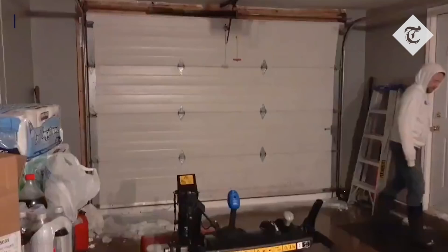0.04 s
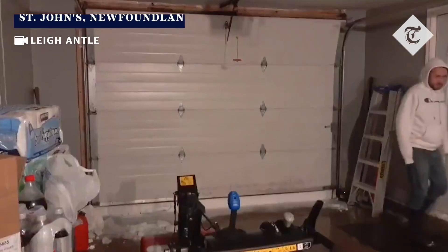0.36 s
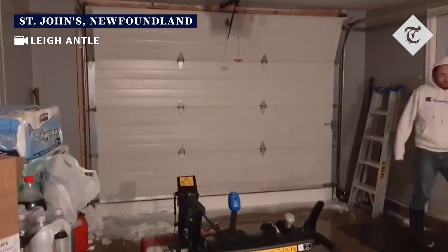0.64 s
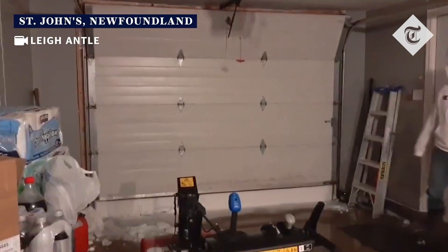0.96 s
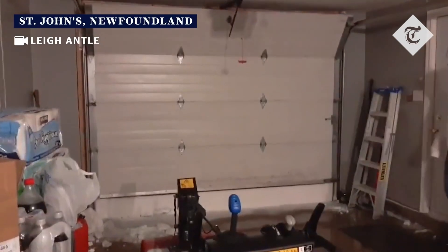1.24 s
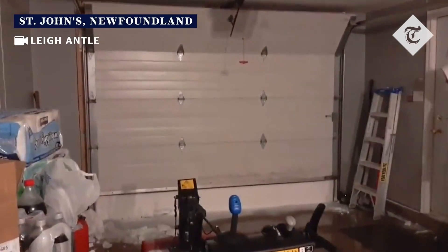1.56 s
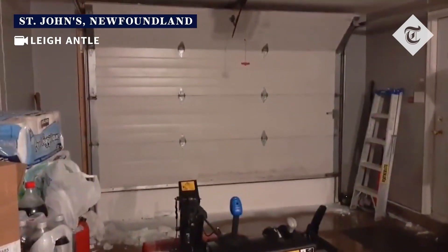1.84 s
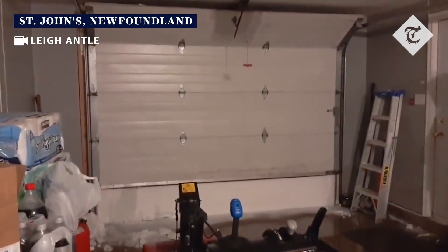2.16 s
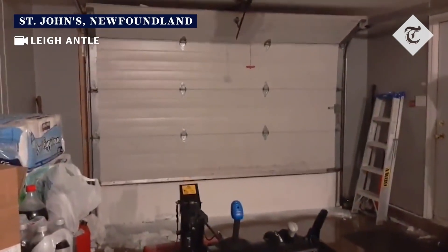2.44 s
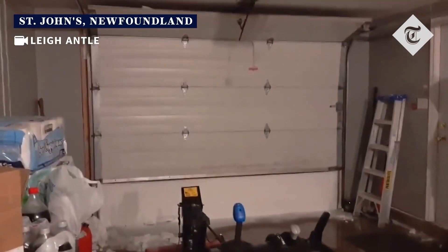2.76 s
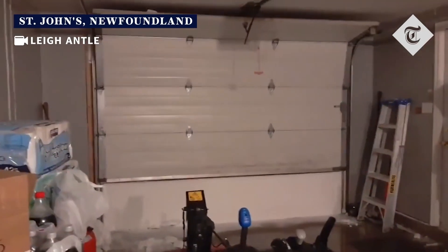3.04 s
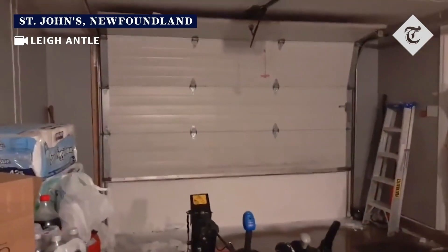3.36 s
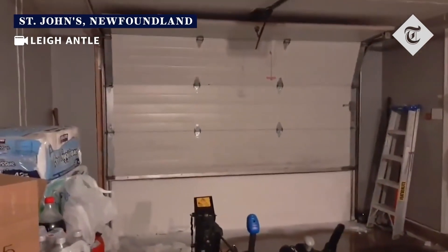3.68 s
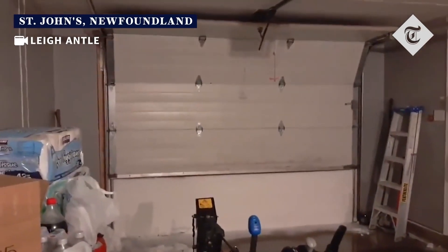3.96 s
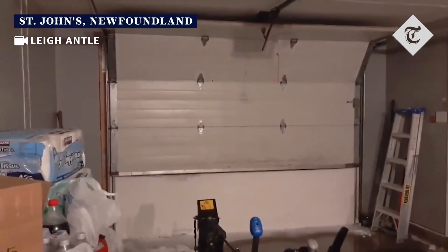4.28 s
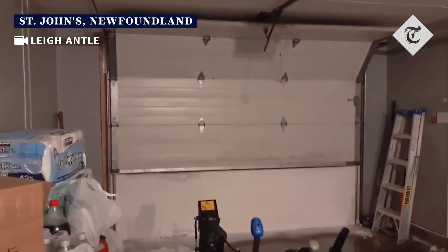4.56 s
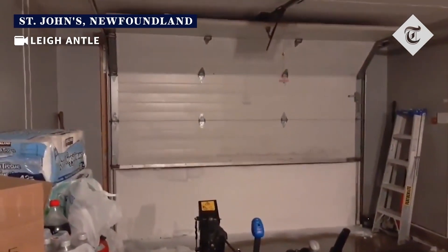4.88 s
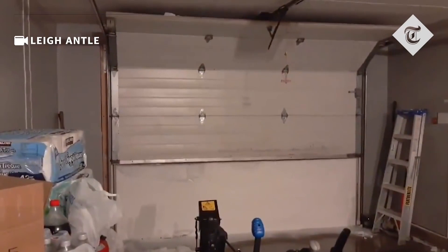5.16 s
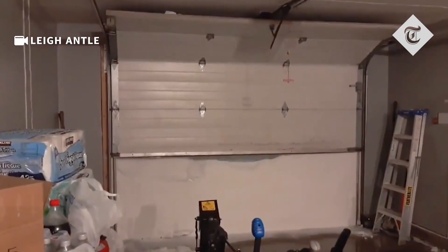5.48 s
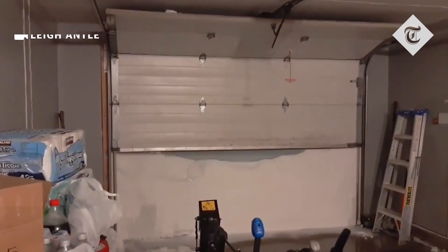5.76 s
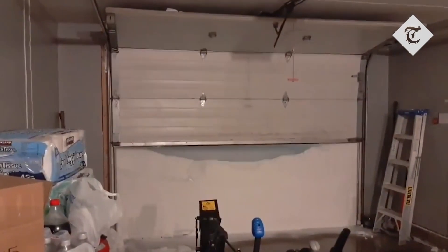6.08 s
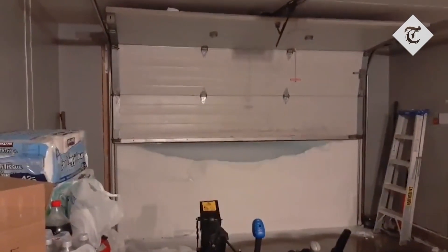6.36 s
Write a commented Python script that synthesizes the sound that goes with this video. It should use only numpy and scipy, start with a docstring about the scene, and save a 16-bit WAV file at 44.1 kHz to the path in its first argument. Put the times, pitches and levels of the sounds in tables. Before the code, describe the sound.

A garage door opener starts up and runs throughout, its motor humming under a quick, bright chain ticking. Early on, the rollers scrape and clack in the metal tracks as the door lifts. The hum then surges, carries on with scattered hinge clinks and faint rattles, and surges again near the end among more clinks. It is heard from straight ahead inside a small, slightly echoing garage.

```python
"""A motor hums, a chain ticks and rollers clatter as an opener lifts a sectional door in a small garage.
The induction motor hums at twice the mains frequency, with sidebands from its shaft, while the worm
gear churns in the housing. The chain ticks over its sprocket and makes the rail drone when taut.
Rollers scrape and knock through the bend of the steel tracks, and hinges clink. The hum sinks as
a panel tips and surges as the motor takes up the weight."""
import sys
import numpy as np
from scipy import signal
from scipy.fft import rfft, irfft, next_fast_len
from scipy.io import wavfile
from scipy.ndimage import map_coordinates

SR = 44100
rng = np.random.default_rng(int(sys.argv[2]) if len(sys.argv) > 2 else 0)


def master(y):
    """Save y as 16-bit WAV."""
    cut = np.clip(np.atleast_2d(y).T, -1, 1)
    pcm = np.round(cut * 32767)  # scale
    wavfile.write(sys.argv[1], SR, pcm.astype(np.int16))


N = 283122

START_S = 0.26  # the motor switches on
MAINS_HZ, SHAFT_HZ = 60, 26.55
# panels tipping into the bend: (time [s], relative bump level [dB], dip in the motor's load [dB])
PANEL_BUMPS = [(1.352, -55, 4), (3.128, -64, 0), (5.372, -48, 2)]
# the bright colour of chain metal: (frequency [Hz], relative level [dB])
CHAIN_SPECTRUM = [(700, -24.5), (2500, -7), (4000, -8.5), (6600, -8), (8200, -2), (9200, -2.5),
                  (10300, 0.5), (11300, 0.5), (12000, -2), (12900, -1), (14000, -6)]


def amp(db):
    """Decibels to gain."""
    return 10 ** (np.asarray(db) / 20)


def unit(x):
    """x at rms 1."""
    return x / np.sqrt(np.mean(x ** 2) + 1e-20)


def along(points, hz):
    """(Hz, value) points read on a log frequency axis."""
    point_hz, values = np.transpose(points)
    return np.interp(np.log(hz + 1), np.log(point_hz + 1), values)


def clock():
    """The time of every sample in seconds."""
    return np.arange(N) / SR


def wobble(rate):
    """A smooth random curve, rate knots a second."""
    return map_coordinates(rng.standard_normal(int(N * rate / SR) + 4), [clock() * rate])


def swell(start_s, attack_s, hold_s, release_s):
    """An envelope from 0 to 1 and back."""
    return np.interp(clock(), start_s + np.cumsum([0, attack_s, hold_s, release_s]), [0, 1, 1, 0])


def add(track, s, sound):
    """Mix a sound into the track at time s."""
    part = track[max(round(s * SR), 0):][:len(sound)]
    part += sound[:len(part)]


def filtered(x, response):
    """x shaped by a gain that depends on frequency."""
    size = next_fast_len(N + SR // 2)
    return irfft(rfft(x, size) * response(np.fft.rfftfreq(size, 1 / SR)), size)[..., :N]


def coloured(x, spectrum):
    """x through a (Hz, dB) curve, scaled to keep the power of white noise."""
    norm = np.sqrt(np.mean(amp(along(spectrum, np.linspace(0, SR / 2, N))) ** 2))
    return filtered(x, lambda hz: amp(along(spectrum, hz)) / norm)


def tone(hz, drift, drift_rate):
    """A sine of rms 1 whose phase wanders by about drift radians."""
    return np.sqrt(2) * np.sin(2 * np.pi * (hz * clock() + rng.random()) + drift * wobble(drift_rate))


def grains(rate, spread_db):
    """Tiny random contacts of uneven size, about rate a second, at rms 1."""
    hits = rng.random(N) < rate / SR
    return unit(hits * rng.standard_normal(N) * amp(spread_db * rng.standard_normal(N)))


def resonance(pitch_hz, width_hz):
    """A rubbed resonance: narrow noise of rms 1."""
    return unit(filtered(rng.standard_normal(N), lambda hz: 1 / (1 + ((hz - pitch_hz) / width_hz) ** 4)))


def shifting(x, depth_db):
    """Moving contacts favour ever different resonances."""
    spectra = signal.stft(x, nperseg=512)[2]
    patch = np.outer(signal.windows.hann(9), signal.windows.hann(19))  # bands by frames
    ripple = signal.fftconvolve(rng.standard_normal(spectra.shape), patch, "same")
    return signal.istft(spectra * amp(depth_db * unit(ripple)), nperseg=512)[1][:N]


def contact(t60, attack_s):
    """Loose metal chatters in a burst of noise that falls 60 dB in t60 seconds."""
    t = np.arange(SR // 4) / SR
    return rng.standard_normal(len(t)) * amp(-60 * t / t60) * (1 - np.exp(-t / attack_s))


def ping(hz, t60, attack_s):
    """A struck steel part rings briefly on one mode."""
    t = np.arange(SR // 8) / SR
    return np.sin(2 * np.pi * hz * t) * amp(-60 * t / t60) * (1 - np.exp(-t / attack_s))


def stroke(sound, length_s):
    """A short rub that swells and fades."""
    shape = np.sqrt(signal.windows.cosine(round(length_s * SR)))
    return shape * unit(sound[:len(shape)])


def garage(x, wet_db):
    """Direct sound plus the walls' answer, which changes as the door and chain move."""
    # the room's decay: (frequency [Hz], t60 [s])
    reverb_times = [(150, 0.51), (1500, 0.48), (6000, 0.32), (13000, 0.24)]
    echo, hop = np.zeros(N), SR // 8
    for i in range(0, N, hop):
        hz, t, spectra = signal.stft(rng.standard_normal(SR // 3), SR, nperseg=256)
        decay = amp(-60 * t / along(reverb_times, hz)[:, None])
        tail = signal.istft(spectra * decay, SR, nperseg=256)[1]
        add(echo, i / SR + 0.003, signal.fftconvolve(x[i:i + hop], tail / np.linalg.norm(tail)))
    return (x + amp(wet_db) * echo) / np.hypot(1, amp(wet_db))


def run_up(depth_db, time_s):
    """A level offset in dB that rises to 0 as the motor gathers speed."""
    return -depth_db * np.exp(-np.maximum(clock() - START_S, 0) / time_s)


def tension():
    """How taut the chain is: 1 would be fully taut, below 0 it hangs loose."""
    # the chain tightens or sags: (start [s], attack [s], hold [s], release [s], tension [1 = taut])
    pulls = [(.6, 0.63, 0.08, 0.31, 0.34), (2.4, 1.37, 0.88, 0.52, 0.79), (5.4, 0.52, 0.29, 0.15, -0.6)]
    return sum(strength * swell(*shape) for *shape, strength in pulls)


def bend():
    """How hard the first rollers press into the bend of the track, 0 to 1."""
    return swell(start_s=1.0, attack_s=0.35, hold_s=0.54, release_s=0.48)


def effort():
    """The motor's load in dB: it sinks as a panel tips and surges at each take-up."""
    # the motor takes up a panel's weight: (time [s], rise in load [dB])
    take_ups = [(2.18, 10.5), (5.49, 9)]
    surge = sum(db * swell(s, attack_s=0.026, hold_s=0.041, release_s=0.82) for s, db in take_ups)
    relief = sum(db * swell(s - 0.13, attack_s=0.065, hold_s=0, release_s=0.27)
                 for s, _, db in PANEL_BUMPS)
    return surge - relief


def friction(taut_db, bend_db):
    """The dB that a rubbing part gains from the motor's speed, the chain's pull and the bend."""
    easing_db = 0.21 * clock()  # parts run lighter as the door comes to lie overhead
    return run_up(depth_db=32, time_s=0.084) + taut_db * tension() + bend_db * bend() - easing_db


def hum_level(level_db, taut_db, load_share):
    """Level in dB of a motor tone that follows the load and swells with the chain's tension."""
    pull_db = taut_db * np.maximum(tension(), 0) ** 0.63
    return level_db + run_up(depth_db=20.5, time_s=0.13) + pull_db + load_share * effort()


def octave_level():
    """Level in dB of the hum's octave: a taut chain carries it into the rail, most of all midway."""
    midway = swell(start_s=3.52, attack_s=0.63, hold_s=1.0, release_s=0.13)
    return hum_level(level_db=-51.5, taut_db=5, load_share=0.26) + 4.76 * midway + 0.17 * clock()


def rotor_level():
    """Level in dB of the rotor's sideband: it grows with the lift and as the top panel clears the bend."""
    lifting = swell(start_s=0.74, attack_s=3.1, hold_s=1.7, release_s=2.0)
    clearing = swell(start_s=2.3, attack_s=0.25, hold_s=0.38, release_s=0.41)
    return -62.5 + 10.7 * lifting + 6.7 * clearing + run_up(depth_db=22, time_s=0.087)


def motor():
    """Magnetic pull hums at even multiples of the mains; the turning rotor adds wavering sidebands."""
    # weaker motor tones: (multiple of the mains, added multiple of the shaft, relative level [dB])
    overtones = [(0, 1, -74), (2, 2, -80), (4, -1, -58.5), (4, 1, -59.5), (4, 2, -57.5), (6, -1, -64.5),
                 (6, 0, -55.5), (8, 0, -63), (10, 0, -61.5), (12, 1, -63), (24, 0, -67), (0, 64, -72)]
    hum_db = hum_level(level_db=-49.5, taut_db=2, load_share=0.52) - 0.08 * clock() + 1.2 * wobble(6.6)
    rotor_db = rotor_level() + 2.2 * wobble(9)
    hum = amp(hum_db) * tone(2 * MAINS_HZ, drift=0.12, drift_rate=12)
    hum += amp(octave_level() + 0.8 * wobble(8.6)) * tone(4 * MAINS_HZ, drift=0.27, drift_rate=4)
    hum += amp(rotor_db) * tone(2 * MAINS_HZ + SHAFT_HZ, drift=0.86, drift_rate=3.98)
    drag = amp(friction(taut_db=3, bend_db=3.5))
    for mains, shaft, db in overtones:
        drift = 0.61 + 0.62 * abs(shaft) ** 0.5
        partial = tone(mains * MAINS_HZ + shaft * SHAFT_HZ, drift, drift_rate=4)
        hum += drag * amp(db - 5.5 + 2.9 * wobble(3.03)) * partial
    return hum


def gear():
    """Gear teeth rub hardest at each torque pulse and shake the housing, less as the chain slackens."""
    # the housing's hollow colour: (frequency [Hz], relative level [dB])
    housing = [(15, -47), (30, -16), (80, -7), (125, -2.5), (200, -2), (310, -0.5), (400, -7.5), (500, -7),
               (630, -1.5), (740, -4), (860, -13), (1300, -15.5), (3000, -27)]
    slackening = swell(start_s=4.6, attack_s=0.54, hold_s=1.1, release_s=0.5)
    gear_db = -48 + friction(taut_db=0.7, bend_db=1) - 0.85 * slackening
    torque = amp(1.5 * np.sin(2 * np.pi * 2 * MAINS_HZ * clock()))
    rub = garage(grains(rate=3500, spread_db=2), wet_db=3) * torque
    return amp(gear_db) * unit(coloured(rub, housing))


def rail_drone():
    """The rail drones on two resonances, louder under a taut chain."""
    low = amp(-59.5 + friction(taut_db=5.5, bend_db=-1)) * resonance(pitch_hz=308.7, width_hz=66)
    high = amp(octave_level() - 15) * resonance(pitch_hz=626, width_hz=38)
    return low + high


def whine():
    """A thin, wavering gear whine on two high multiples of the mains swells in mid travel."""
    mid_travel = swell(start_s=2.2, attack_s=0.69, hold_s=0.59, release_s=0.47)
    low_db = -65 + run_up(depth_db=20, time_s=0.3) + 8 * mid_travel
    high_db = -77 + run_up(depth_db=23, time_s=0.33) + 9 * tension()
    low = amp(low_db + 0.88 * wobble(7.5)) * tone(12 * MAINS_HZ, drift=0.4, drift_rate=6)
    high = amp(high_db + 2.2 * wobble(4.9)) * tone(70 * MAINS_HZ, drift=0.8, drift_rate=7.7)
    return low + high


def rollers():
    """Rollers run over grit in the steel tracks."""
    # the tracks' tinny colour: (frequency [Hz], relative level [dB])
    track_spectrum = [(400, -51), (900, 0), (1100, 0), (1350, -6.5), (1700, 0.5), (2300, -3), (4000, -3.5),
                      (5000, -5.5), (7000, -7), (14000, -11.5)]
    roller_db = -53.5 + friction(taut_db=0, bend_db=1)
    grit = garage(grains(rate=2000, spread_db=3.5), wet_db=8.5)
    return amp(roller_db) * unit(shifting(coloured(grit, track_spectrum), depth_db=2.5))


def rumble():
    """The moving door shakes the room faintly, whatever the load."""
    # the door's low end: (frequency [Hz], relative level [dB])
    rumble_spectrum = [(12, -41), (28, 12), (50, 0), (80, 1), (130, -10), (300, -72)]
    shake = unit(coloured(rng.standard_normal(N), rumble_spectrum))
    return amp(-65 + run_up(depth_db=31, time_s=0.067)) * shake


def chain():
    """The chain slides and rasps along its rail, and each link ticks on the sprocket."""
    # the chain's travel over the sprocket: (time [s], position [links])
    travel = [(.29, -2), (1.783, 18), (2.095, 22), (3.17, 36), (4.938, 60), (5.476, 67), (6.48, 80)]
    taut, starting_db = tension(), run_up(depth_db=22, time_s=0.086)
    slide_db = -51.5 + 5.5 * taut + starting_db + 0.8 * wobble(7.9)
    slide = amp(slide_db) * grains(rate=7000, spread_db=4)
    rasp_db = -64 + 9.5 * taut + starting_db + 2.6 * wobble(7)
    rasp = amp(rasp_db) * resonance(pitch_hz=5140, width_hz=2800)
    tick_db = -43.5 + 1.5 * taut + starting_db
    position = np.interp(clock(), *np.transpose(travel))
    onsets = np.flatnonzero(np.diff(np.floor(position)))
    ticks = np.zeros(N)
    for i, accent_db in zip(onsets, 1.9 * rng.standard_normal(len(onsets))):
        add(ticks, i / SR, amp(tick_db[i] + accent_db) * contact(t60=0.07, attack_s=0.0011))
    links = garage(coloured(slide + ticks, CHAIN_SPECTRUM), wet_db=2.5)
    return shifting(rasp + links, depth_db=1.4)


def clinks():
    """Slack links and hinges snap against each other: a sharp chatter and a short ring, then the room."""
    # snaps of chain and hinges: (time [s], relative level [dB], pitch [Hz])
    snaps = [(0.4372, -35.5, 11800), (0.8299, -35.5, 9960), (1.1132, -35, 9700), (1.486, -40, 9840),
             (1.5597, -38, 9810), (1.709, -32, 9820), (1.735, -33.5, 10200), (2.1703, -36, 9800),
             (2.2471, -38, 11200), (2.325, -34, 10500), (2.477, -35, 11600), (2.6285, -33.5, 10200),
             (2.761, -37, 12100), (2.86, -30.5, 11800), (3.3132, -37, 9990), (4.571, -32.5, 8200),
             (5.1502, -33.5, 12000), (5.3182, -33.5, 9070), (5.551, -33.5, 10800), (5.7148, -35, 12200),
             (5.851, -33, 11800), (5.8598, -35, 11900), (6.0106, -40, 10100), (6.0914, -34, 9000),
             (6.2013, -32.5, 11800), (6.2455, -32.5, 10400), (6.402, -37, 8800)]
    # the colour of hard steel contacts: (frequency [Hz], relative level [dB])
    steel = [(700, -28), (3000, -9), (7000, -6), (8500, -2), (10500, 0), (12000, -0.5), (14000, -2.5)]
    chatter, ring = np.zeros(N), np.zeros(N)
    for s, db, hz in snaps:
        add(chatter, s, amp(db + 4.5) * contact(t60=0.026, attack_s=0.001))
        add(ring, s, amp(db - 1.5) * ping(hz, t60=0.018, attack_s=0.0013))
    return ring + garage(coloured(chatter, steel) + amp(-4) * ring, wet_db=8)


def rattles(per_s=11):
    """Loose hinges and rollers tick at random once the door moves."""
    ticks = np.zeros(N)
    moving = clock() > START_S + 0.2
    for i in np.flatnonzero((rng.random(N) < per_s / SR) & moving):
        add(ticks, i / SR, amp(-42 + 4 * rng.standard_normal()) * contact(t60=0.015, attack_s=0.00054))
    return garage(coloured(ticks, CHAIN_SPECTRUM), wet_db=1.5)


def groan():
    """The track groans as the first rollers round its bend."""
    # the track's rubbed resonances: (pitch [Hz], width [Hz], level [dB])
    modes = [(525, 61, -59.5), (1190, 200, -61), (1640, 330, -63)]
    return bend() * sum(amp(db + 3.3 * wobble(8.05)) * resonance(hz, width) for hz, width, db in modes)


def scrapes():
    """A roller drags along the side of its track."""
    # roller drags: (time [s], length [s], pitch [Hz], width [Hz], relative level [dB])
    drags = [(1.16, 0.073, 820, 220, -50), (1.47, 0.08, 3380, 750, -51), (1.735, 0.063, 3780, 2000, -52),
             (1.83, 0.17, 3270, 550, -57), (1.82, .13, 1110, 600, -49.5), (2.134, 0.64, 1030, 70, -58),
             (5.335, 0.1, 2770, 330, -50)]
    out = np.zeros(N)
    for s, length_s, pitch_hz, width_hz, db in drags:
        add(out, s, amp(db - 2) * stroke(resonance(pitch_hz, width_hz), length_s))
    return out


def panels():
    """A soft bump rings the low modes of a door panel as it tips into the bend."""
    # a panel's modes: (pitch [Hz], relative level [dB], t60 [s])
    modes = [(155, -4, 0.52), (188.6, 0, 0.2), (215, -4, 0.34), (355, -24, 0.59)]
    out, t = np.zeros(N), np.arange(SR // 2) / SR
    soft_attack = 1 - np.exp(-t / 0.0081)
    for s, db, _ in PANEL_BUMPS:
        ring = sum(amp(mode_db - 60 * t / t60) * np.sin(2 * np.pi * (hz * t + rng.random()))
                   for hz, mode_db, t60 in modes)
        add(out, s, amp(db + 12) * ring * soft_attack)
    return out


def knocks():
    """A roller jumps in its track at the bend: a dry crack and a short clank."""
    # rollers hitting the track: (time [s], relative level [dB], pitch [Hz])
    hits = [(1.481, -43, 2960), (1.5047, -42, 3740), (1.6316, -42, 3220), (1.7332, -34, 3530),
            (1.749, -37, 2930), (1.8312, -40.5, 3200), (1.863, -40, 3580), (1.879, -41, 3570),
            (1.94, -42, 3480)]
    # the crack's colour: (frequency [Hz], relative level [dB])
    crack_spectrum = [(800, -23), (2500, -1.5), (3600, -5), (5500, -7.5), (9000, -10.5)]
    crack, ring = np.zeros(N), np.zeros(N)
    for s, db, hz in hits:
        add(crack, s, amp(db + 1.5) * contact(t60=0.022, attack_s=0.00065))
        add(ring, s, amp(db - 1.5) * ping(hz, t60=0.021, attack_s=0.0011))
    return ring + garage(coloured(crack, crack_spectrum) + amp(-8) * ring, wet_db=2)


def squeaks():
    """A dry link hisses and rubs one high steel resonance for a moment."""
    # dry links rubbing: (time [s], length [s], level of the resonance [dB])
    rubs = [(1.929, 0.088, -52.5), (2.75, 0.051, -54), (5.134, 0.31, -51.5), (5.712, 0.043, -55),
            (5.856, 0.022, -49)]
    out = np.zeros(N)
    for s, length_s, db in rubs:
        squeal = resonance(pitch_hz=12100, width_hz=370)
        hiss = coloured(rng.standard_normal(N), CHAIN_SPECTRUM)
        add(out, s, amp(db) * stroke(squeal, length_s))
        add(out, s, amp(db + 4) * stroke(hiss, length_s))
    return out


def scene():
    """Everything starts with the motor and sits in the centre."""
    switch_on = np.clip((clock() - START_S) / 0.008, 0, 1)
    machinery = motor() + gear() + rail_drone() + whine() + rollers() + groan() + chain()
    clatter = clinks() + knocks() + squeaks() + scrapes() + panels()
    centre = switch_on * (machinery + clatter + rumble() + rattles())
    return np.array([centre, centre])


def record(dry):
    """A steep low-pass takes off the highest treble."""
    cutoff_hz, edge_hz = 14050, 200
    return filtered(dry, lambda hz: np.clip((cutoff_hz - hz) / edge_hz + 0.5, 0, 1))


dry = scene()
out = record(dry)
master(out)
```